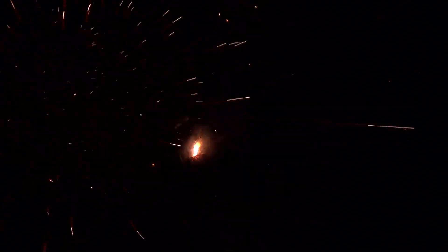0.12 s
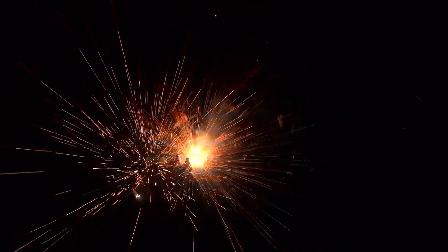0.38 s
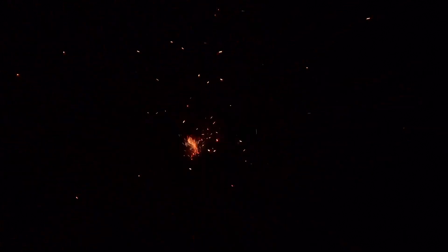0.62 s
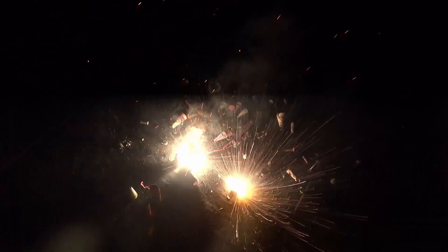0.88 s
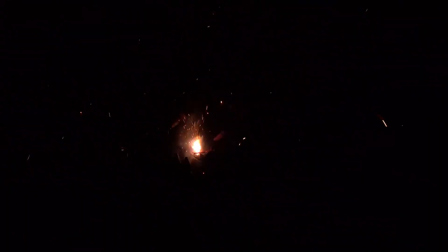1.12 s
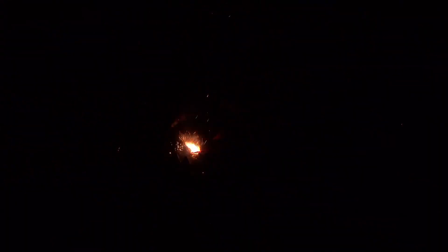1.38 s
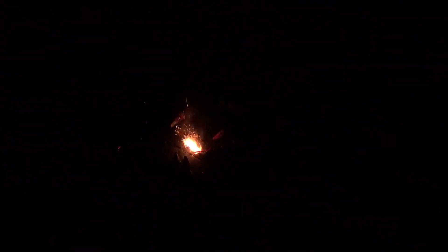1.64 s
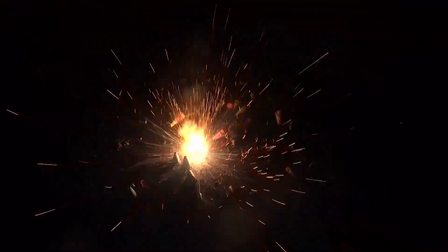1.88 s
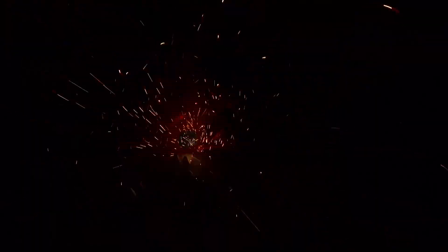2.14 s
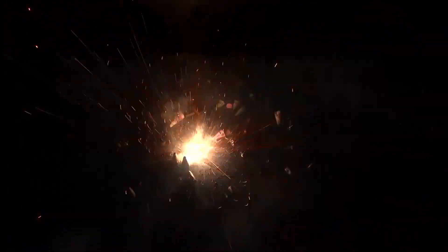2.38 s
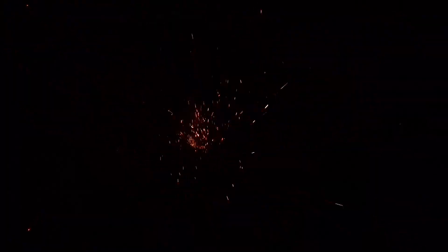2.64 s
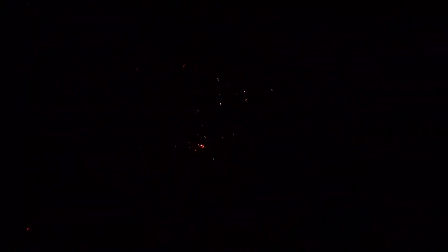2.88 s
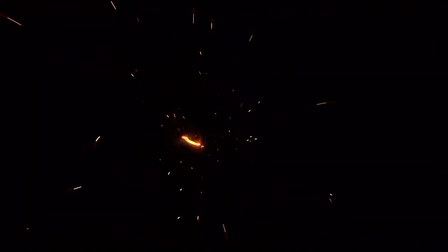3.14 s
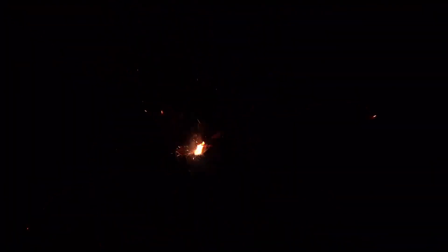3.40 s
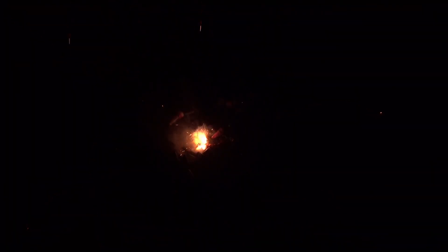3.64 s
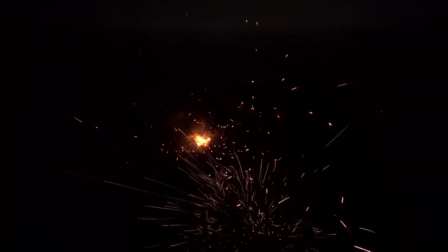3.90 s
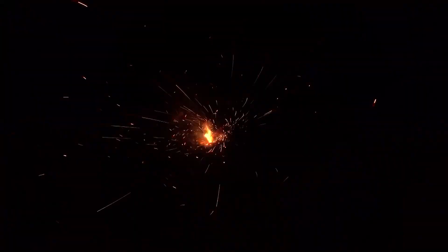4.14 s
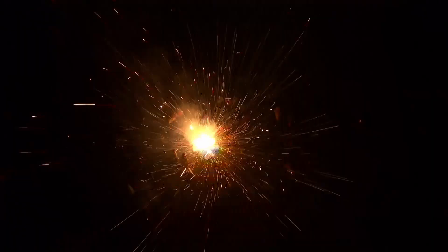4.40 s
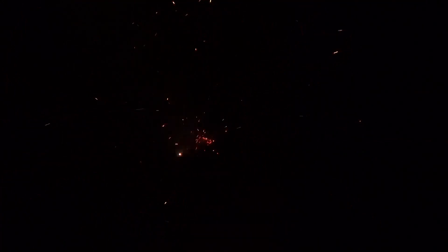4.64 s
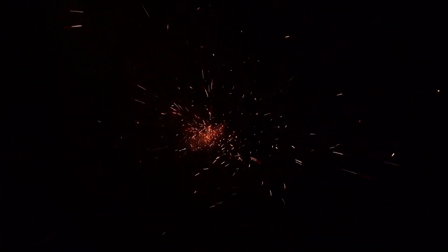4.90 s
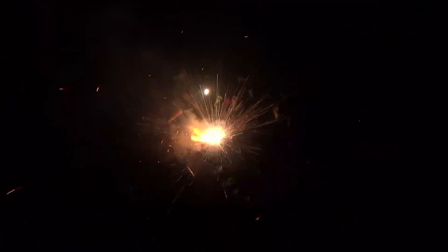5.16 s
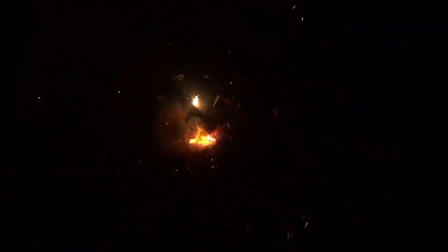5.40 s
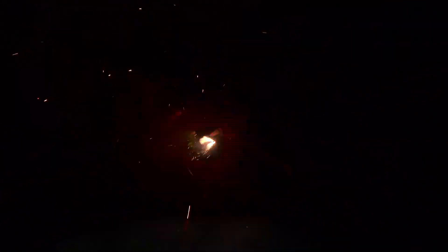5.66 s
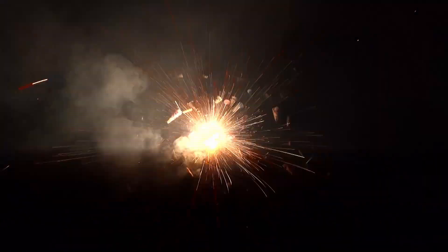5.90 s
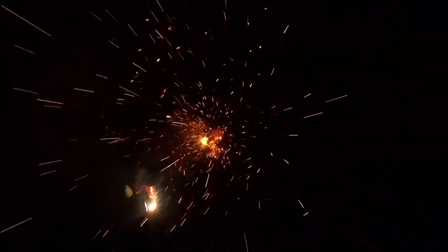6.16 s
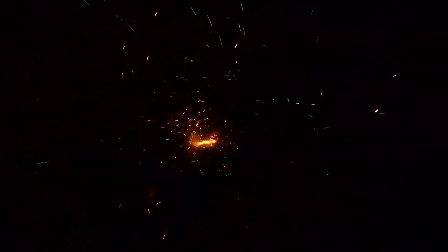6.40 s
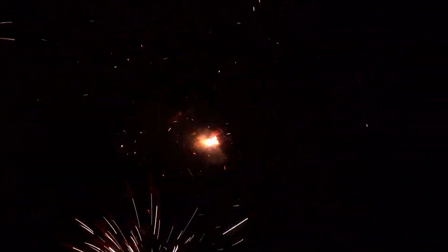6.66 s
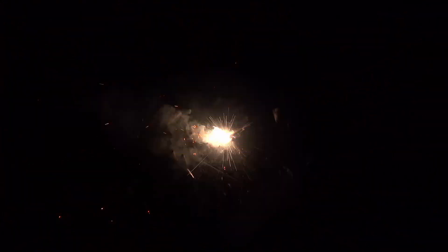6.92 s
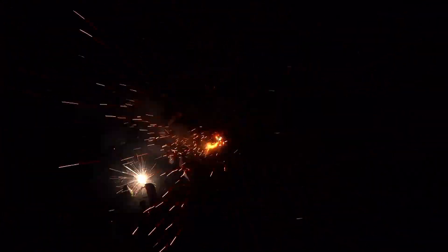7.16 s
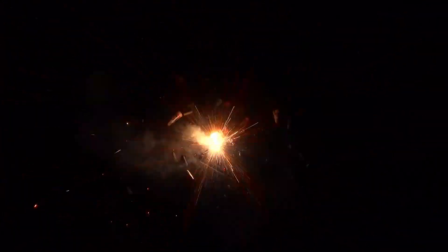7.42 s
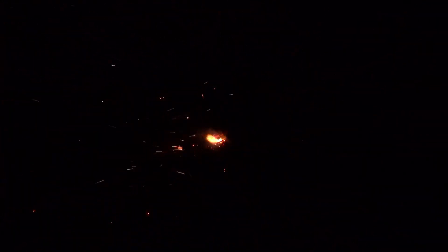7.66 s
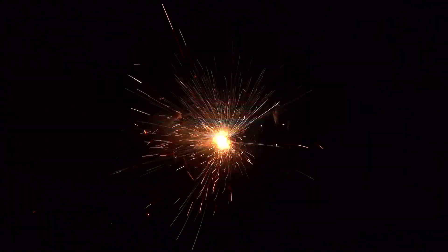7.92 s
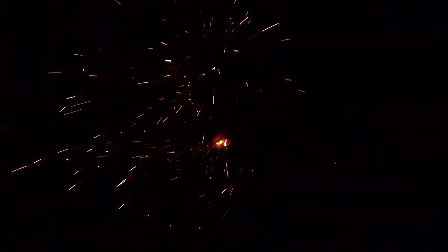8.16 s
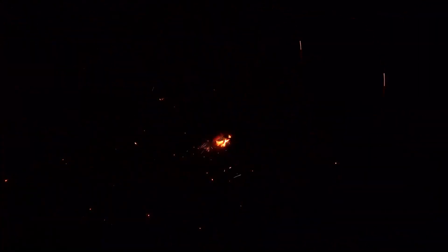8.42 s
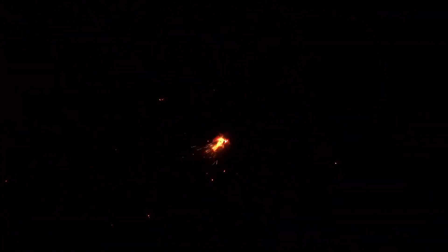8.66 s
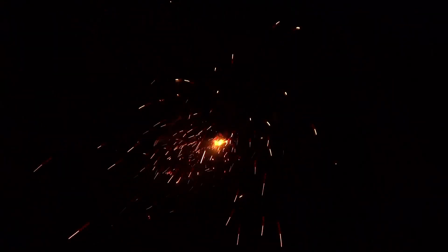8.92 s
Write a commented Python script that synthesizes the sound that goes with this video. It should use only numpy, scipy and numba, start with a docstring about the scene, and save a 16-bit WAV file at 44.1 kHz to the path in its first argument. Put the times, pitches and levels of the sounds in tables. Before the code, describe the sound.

Crackling firework stars burst on the ground in a walled yard at night, hard cracks with slapping echoes and hissing tails over a fizzing fuse.

```python
"""A ribbon of crackling stars burns on the ground of a walled yard at night, a few steps from a small camera.
From the start stars burst with a crack and a low push; walls answer with slaps and a hissing tail, far houses rumble.
A faint pop and then a dull bang come from farther off near 1.5 s; after 2.6 s the bursts thin and the fuse shows.
From 3.8 s the bursts crowd again to the end, with faint distant pops near 7.4 s. The fuse fizzes throughout.
The camera's fast limiter squashes the bursts and lets the tails swell."""
import sys
import numpy as np
from scipy import signal
from scipy.fft import rfft, irfft, next_fast_len
from scipy.io import wavfile
from scipy.ndimage import uniform_filter1d, minimum_filter1d, map_coordinates
from numba import njit

SR = 44100
rng = np.random.default_rng(int(sys.argv[2]) if len(sys.argv) > 2 else 0)


def inscribe(sig):
    """Save sig as 16-bit PCM at rate SR to the path in sys.argv[1].

    A 1-D sig is mono; a 2-D sig holds one channel per row.
    Samples are clipped to [-1, 1] before scaling.
    """
    pcm = np.round(np.clip(np.atleast_2d(sig).T, -1, 1) * 32767)
    wavfile.write(sys.argv[1], SR, pcm.astype(np.int16))


def field_ratio(decibels):
    """Amplitude ratio for a level in dB (20 dB per decade); scalars and array-likes work."""
    return 10 ** (np.asarray(decibels, dtype=float) / 20)


N = 399105  # length in samples
LEAD = SR // 10  # samples of room for a burst just before the start

# Slaps from the yard walls. Each row: delay after the burst in ms, level relative to the other walls in dB.
WALL_SLAPS = [(7.4, 2), (9.6, 8), (12.5, 3), (17, 11), (20.3, 11), (25, 3), (37.2, 9), (59, 4), (75, 4)]
# Colour of sound from a distance. Each row: frequency in Hz, relative level in dB per Hz.
DISTANT_COLOUR = [(35, -43.5), (60, -22), (182, -0.5), (450, -0.5), (719, -3.5), (785, -9), (858, 0),
                  (917, -7.5), (6600, -24.5), (12000, -35), (15600, -63), (22000, -120)]


def unit(x):
    """Scales to rms 1 along the last axis."""
    return x / np.sqrt(np.mean(x ** 2, axis=-1, keepdims=True) + 1e-20)


def along(points, hz):
    """Interpolates (Hz, value) points on a log frequency axis."""
    f, v = np.transpose(points)
    return np.interp(np.log(hz + 1), np.log(f + 1), v)


def filtered(x, response):
    """Multiplies the spectrum of x by a complex response of frequency."""
    m = next_fast_len(x.shape[-1] + 8192)
    spectrum = rfft(x, m) * response(np.fft.rfftfreq(m, 1 / SR))
    return irfft(spectrum, m)[..., :x.shape[-1]]


def noise(spectrum, size):
    """Coloured noise of rms 1."""
    white = rng.standard_normal(size)
    return unit(filtered(white, lambda hz: field_ratio(along(spectrum, hz))))


def wobble(rate):
    """A smooth random curve with rate knots a second, at most 60."""
    knots = rng.standard_normal(int(N / SR * 60) + 4)
    return map_coordinates(knots, [np.arange(N) * min(rate, 60) / SR])


def placed(times, sounds):
    """Sum of sounds that start at the given seconds."""
    out = np.zeros(LEAD + N + sounds.shape[-1])
    for s, sound in zip(times, sounds):
        out[LEAD + round(s * SR):][:len(sound)] += sound
    return out[LEAD:LEAD + N]


def street(s, echo_db):
    """Far houses return a slow, lumpy rumble of each burst: dull noise under the summed power of slow swells."""
    # Dull answer of the houses. Each row: frequency in Hz, relative level in dB per Hz.
    house_colour = [(35, -34.5), (60, -14), (215, 6), (284, -2.5), (369, 1), (504, -1), (676, -13.5),
                    (3000, -8), (3900, -45), (6600, -120)]
    t = np.arange(SR) / SR
    swell = field_ratio(-60 * t / 1.44) * (1 - np.exp(-t / 0.075))  # t60 1.44 s, rise 75 ms
    power = placed(s, field_ratio(2 * (echo_db - 29.0))[:, None] * swell ** 2)
    lumps = field_ratio(3.5 * wobble(35))
    return np.sqrt(power) * lumps * noise(house_colour, N)


def far_bang():
    """A distant firework: a dull knock and a short low swing, then ragged echoes of noise."""
    # The bang and its echoes. Each row: start in seconds, level in dB.
    arrivals = [(1.6813, -14), (1.697, -23.5), (1.708, -23), (1.753, -18.5), (1.799, -29), (1.832, -27.5)]
    s, db = np.transpose(arrivals)
    t = np.arange(SR // 4) / SR
    echoes = noise(DISTANT_COLOUR, (len(s), len(t)))
    echoes *= field_ratio(-2.5 - 60 * t / 0.24) * (1 - np.exp(-t / 0.0032))
    knock = field_ratio(5 - 60 * t / 0.0044) * np.sin(2 * np.pi * 1100 * t + np.pi)
    boom = np.sin(2 * np.pi * 290 * t - 1.2) * field_ratio(-60 * (t / .018) ** 2)
    rounded_front = 1 - np.exp(-t / 0.0002)  # distance rounds the front
    echoes[0] = (boom + knock) * rounded_front + 0.3 * echoes[0]
    return placed(s, field_ratio(db)[:, None] * echoes)


def far_pops():
    """Distant crackers arrive as short rough blips over a thud."""
    # Each row: start in seconds, level in dB, blip pitch in Hz, relative level of the thud in dB.
    pops = [(1.39, -29.5, 497, -10), (7.301, -27, 940, 2), (7.346, -26, 892, -19), (7.384, -32, 1070, -8),
            (7.408, -24, 1230, -8), (7.425, -24, 1110, -5)]
    s, db, hz, thud_db = np.transpose(pops)[..., None]
    t = np.arange(SR // 20) / SR
    blip = np.sin(2 * np.pi * hz * t)
    blip = blip + field_ratio(thud_db + 2.0) * np.sin(2 * np.pi * 290 * t)
    blip += 0.91 * noise(DISTANT_COLOUR, blip.shape)
    envelope = field_ratio(db - 1 - 60 * t / 0.026) * (1 - np.exp(-t / 0.0023))
    return placed(s[:, 0], envelope * blip)


def fuse():
    """The burning ribbon: two noises, a high fizz and a low flame flutter, drift and wobble in level."""
    # Each row: time in seconds, fizz level in dB, flame level in dB.
    burning = [(0.7, -53, -45.5), (1.4, -55, -48.5), (1.56, -57.5, -53), (1.66, -53, -53),
               (2.9, -52.5, -64), (3.02, -49.5, -53), (3.3, -57, -60.5), (3.376, -56.5, -60),
               (3.404, -45.5, -57), (3.448, -52.5, -60), (3.572, -51.5, -61), (3.628, -50.5, -52.5),
               (3.76, -50.5, -54), (7.44, -50, -49), (8.58, -57, -53.5), (8.686, -57, -55.5),
               (8.75, -48, -52)]
    # Colours of the two. Each row: frequency in Hz, relative level in dB per Hz.
    fizz_colour = [(710, -49.5), (1200, -9.5), (5760, -7.5), (7170, -1.5), (8180, -3), (9540, -1.5),
                   (12100, -6), (15300, -9), (16000, -32), (16500, -41.5)]
    flame_colour = [(15, -29), (25, -29), (97, -8.5), (143, -7), (275, -5), (310, -6.5), (350, -5.5),
                    (1500, -18), (1950, -32), (3300, -120)]
    s, fizz_db, flame_db = np.transpose(burning)
    t = np.arange(N) / SR
    fizz = field_ratio(np.interp(t, s, fizz_db) + 0.33 * wobble(52)) * noise(fizz_colour, N)
    flame = field_ratio(np.interp(t, s, flame_db) + 0.75 * wobble(33)) * noise(flame_colour, N)
    return fizz + flame


def earlier_ms(s):
    """Stars flung nearer the walls are answered sooner: a negative shift in ms."""
    # Each row: time of the burst in seconds, shift of its slaps in ms (negative is sooner).
    thrown = [(.94, -2.9), (5.56, -1.7), (5.95, -2.4), (8.14, -2.7)]
    return sum(ms * (np.abs(s - at) < .01) for at, ms in thrown)


def yard(s, echo_db, band_hz, lift_db, swell_db):
    """Every burst gets its own tail: wall slaps, a swell near 32 ms, then a hiss whose bands die at their own rates."""
    # Colour of the echo. Each row: frequency in Hz, relative level in dB per Hz.
    yard_colour = [(59, -40), (100, -32), (190, 5), (496, -8), (963, 2.5), (1410, -5.5), (1750, 1),
                   (2360, -2.5), (2630, 1.5), (3180, -2.5), (7020, -1.5), (10100, -6), (13300, -12),
                   (15500, -22), (16500, -51)]
    # Decay of the yard. Each row: frequency in Hz, time to fall 60 dB in seconds.
    decay = [(100, 0.11), (500, 0.47), (2000, 0.39), (6000, 0.45), (10000, 0.36), (15000, 0.3)]
    hz, frame, z = signal.stft(rng.standard_normal((len(s), SR * 3 // 5)), SR, nperseg=256)
    octaves = np.log2((hz + 1) / band_hz[:, None])
    hump_db = lift_db[:, None] * np.exp(-(octaves / 1.24) ** 2)  # blast length sets the band
    colour_db = along(yard_colour, hz) + hump_db
    z = z * field_ratio(colour_db[..., None] - 60 * frame / along(decay, hz)[:, None])
    tail = signal.istft(z, SR, nperseg=256)[1]
    tail /= np.sqrt(np.mean(tail[:, 900:1800] ** 2, axis=1, keepdims=True))  # rms 1 from 20 to 41 ms

    ms = np.arange(tail.shape[1]) / SR * 1000 - earlier_ms(s)[:, None]
    shape = 1 - np.exp(-np.maximum(ms - 6, 0) / 8)  # scattered sound fills in after the first wall
    shape *= 1 + field_ratio(swell_db)[:, None] * np.exp(-((ms - 32) / 22) ** 2)
    glints = rng.exponential(size=tail.shape) ** 3  # small hard faces glint
    specks = unit(uniform_filter1d(glints, size=30, axis=1) - 6)
    shape *= field_ratio(2.8 * np.exp(-ms / 130) * np.minimum(specks, 3.5))

    early = ms[:, :SR // 10]
    luck = rng.standard_normal((len(s), len(WALL_SLAPS), 2)) * [.15, 2]  # spread in ms and in dB
    smear_db = -0.32 * (echo_db[:, None] + 23.5)  # big bursts fill the yard, so their slaps stand out less
    slaps = np.zeros_like(early)
    for k, (at, db) in enumerate(WALL_SLAPS):
        late = np.maximum(early - at - luck[:, k, :1], 0)
        slap_db = db + smear_db + luck[:, k, 1:] - 60 * late / 7
        slaps += (1 - np.exp(-late / 0.23)) * field_ratio(slap_db)
    head = tail[:, :SR // 10]
    echo = shape * tail
    echo[:, :SR // 10] += slaps * (head + 0.14 * np.diff(head, prepend=0))  # one bounce keeps more treble
    return placed(s, field_ratio(echo_db)[:, None] * echo)


def bounces(s, echo_db):
    """Each flat wall sends the crack back as a sharp copy, without the low push."""
    no_push_db = np.full(len(s), -np.inf)
    out = 0
    for ms, db in WALL_SLAPS:
        # weaker by 0.092 dB per dB of echo and by 0.1 dB per ms of path, with 2.6 dB of luck
        loss_db = -25.5 + db - 0.092 * echo_db - 0.1 * ms + rng.normal(0, 2.6, len(s))
        out = out + cracks(s + (ms + earlier_ms(s)) / 1000, echo_db, no_push_db, loss_db)
    return out


def cracks(s, echo_db, push_db, loss_db=0):
    """A shock front rings briefly, spits fragments, and drags a slowing low push behind."""
    # Resonances of the crack. Each row: frequency in Hz, width in Hz, relative level in dB.
    resonances = [(1500, 1000, 6.5), (4260, 2500, 4.5), (6830, 980, 10), (8730, 2300, 5),
                  (13000, 36000, -11)]

    def ring(f):
        """Sum of the resonant bands."""
        return sum(field_ratio(db) * 1j * f * w / (c * c - f * f + 1j * f * w) for c, w, db in resonances)

    t = np.arange(SR // 25) / SR
    spit = field_ratio(-17.0 - 60 * t / 0.014) * rng.standard_normal((len(s), len(t)))
    spit[:, 0] = -1  # the shock front
    snap = filtered(spit, ring)
    snap /= np.abs(snap).max(axis=1, keepdims=True)
    swing = np.sin(np.pi * np.log((t + .0016) / .0022) / np.log(1.76))  # each half swing lasts 1.76 times the last
    push = swing * np.exp(-(t / 0.0063) ** 1.05) * (1 - np.exp(-t / 0.0004))
    push /= np.abs(push).max()
    crack_db = np.maximum(echo_db + 29, 4)  # the direct crack towers over its echo; even small stars snap hard
    return placed(s, field_ratio(crack_db + loss_db)[:, None] * snap + field_ratio(push_db)[:, None] * push)


def scene():
    """Two close microphone ports hear nearly the same, plus and minus a faint side sound; the left is a shade louder."""
    # The bursts. Each row: start in seconds, yard echo level in dB, push peak in dB, favoured echo band in Hz,
    # lift of that band in dB.
    bursts = [(-0.03, -14, -42, 4800, 6), (0.09, -12.5, -4.5, 6240, 7), (0.1105, -14, -16, 1500, 1.5),
              (0.2316, -18, -1.5, 12100, 5), (0.4113, -16.5, -19, 1200, 0), (0.439, -19, -21, 2610, 2),
              (0.8418, -10, -4, 8200, 4.5), (0.9387, -7.5, -22, 12000, -0.5), (0.9514, -14, -25, 4500, 15),
              (0.9869, -14, -3, 1210, 6.5), (1.0455, -15, -3, 1410, 0), (1.8658, -12, 4.5, 1850, 1),
              (1.8996, -15.5, -12, 2600, -4), (1.9437, -13.5, -3.5, 11800, 0.5), (2.038, -14, 6, 4700, 1),
              (2.1176, -11.5, -1, 4000, 0.5), (2.1371, -11.5, 0.5, 10900, 6),
              (2.217, -15.5, -17, 6600, 6.5), (2.3765, -16.5, -0.5, 2600, 1), (2.4245, -13, -1, 1140, 3.5),
              (2.4495, -11.5, -1, 2580, 2.5), (2.6018, -14, 0.5, 1190, -2), (3.039, -28.5, -22, 2920, 1.5),
              (3.7808, -15, 2, 12300, 7.5), (3.8378, -16.5, -3, 12600, 6), (3.9471, -14.5, 0, 12400, 5.5),
              (4.0854, -9.5, -2, 7100, 3), (4.1724, -9, 6, 3000, 8), (4.3459, -19.5, -12, 2920, 4.5),
              (4.4429, -11.5, -5.5, 1260, -5.5), (4.4632, -15.5, -28, 12000, 7),
              (4.5289, -10.5, -29, 10400, 8), (4.7973, -11.5, -1, 1600, -1), (4.852, -12, -1.5, 2620, 1.5),
              (4.9073, -12, -27, 8600, 5.5), (4.9977, -11, -5, 6500, 5), (5.0702, -13, 1.5, 12100, 3),
              (5.2199, -12.5, -15, 12200, 2.5), (5.3242, -13, 3.5, 7200, 5.5),
              (5.558, -33, -24, 11900, 4.5), (5.741, -20.5, -21, 9100, 7),
              (5.9509, -13, -10.5, 12000, -1.5), (5.9563, -18.5, -31, 12000, 22),
              (6.0264, -12, -39, 12300, 1.5), (6.1545, -20, -12.5, 1980, 3), (6.1564, -17.5, -25, 2500, 4),
              (6.2698, -11, -37, 7780, 2.5), (6.3954, -11.5, -3.5, 1200, -0.5),
              (6.563, -12.5, -1.5, 2600, 2.5), (6.6063, -13.5, 0.5, 12000, 4.5),
              (6.7026, -34.5, -22, 4020, 13), (6.823, -15, -1, 12070, 3), (6.9893, -12.5, -4, 2540, 1.5),
              (7.0263, -14, -39, 3520, 5.5), (7.1114, -14, 0, 4470, 3), (7.219, -37.5, -43, 4730, 7),
              (7.4879, -19, -4.5, 1290, 2.5), (7.6388, -14, 2.5, 7900, 4), (7.7881, -9, -14, 7100, 5),
              (7.895, -5, 1.5, 4050, 8), (7.9749, -15, -1.5, 3430, 2), (8.1447, -28, -54.5, 11900, 10),
              (8.2388, -29, -28, 1200, 6.5), (8.3174, -18.5, -19, 1160, 1.5),
              (8.7667, -13, -5.5, 2400, 2.5), (8.8073, -10.5, -12, 1240, -4.5),
              (8.8313, -15, -12, 11800, 8), (8.8445, -19.5, -32, 10700, 0)]
    # Level of the side noise against frequency, with some bands nearly empty.
    # Each row: frequency in Hz, gain of the side in dB.
    side_colour = [(60, -32), (99, -35), (160, -26.5), (270, -21), (450, -25), (740, -22), (1220, -42),
                   (2010, -45), (3330, -120), (5500, -18), (9080, -12.5), (15000, -74)]
    s, echo_db, push_db, band_hz, lift_db = np.transpose(bursts)
    # a stronger push or a quieter echo gives a bigger swell near 32 ms
    swell_db = -36 + 0.73 * push_db - 0.65 * echo_db

    def surroundings():
        """Yard, street and fuse with fresh random draws."""
        return yard(s, echo_db, band_hz, lift_db, swell_db) + street(s, echo_db) + fuse()

    direct = cracks(s, echo_db, push_db) + far_bang() + far_pops()
    mid = direct + bounces(s, echo_db) + surroundings()
    side = filtered(surroundings(), lambda hz: field_ratio(along(side_colour, hz)))
    side += field_ratio(-36) * mid  # tips the balance to the left
    side += filtered(cracks(s, echo_db, push_db), lambda hz: 1j * field_ratio(-19))  # a slight phase gap between ports
    return np.array([mid + side, mid - side])


@njit
def released(needed_db, keep):
    """Gain drops at once and creeps back."""
    out = needed_db.copy()
    for i in range(1, len(out)):
        out[i] = min(out[i], keep * out[i - 1])
    return out


def limiter(x, top_db, ahead_s, release_s):
    """Look-ahead limiter: the level ducks just before a burst and recovers over its tail."""
    peak = np.abs(x).max(axis=0)  # both channels share one gain
    needed_db = np.minimum(0, top_db - 20 * np.log10(peak + 1e-9))
    ahead = max(round(ahead_s * SR), 3)
    held_db = minimum_filter1d(needed_db, 2 * ahead + 1)
    gain_db = released(held_db, np.exp(-1 / (release_s * SR)))
    return x * field_ratio(uniform_filter1d(gain_db, ahead))


def low_pass(x):
    """Removes everything above the highest recorded frequency."""
    return signal.sosfilt(signal.butter(12, 16830, fs=SR, output="sos"), x)


def record(dry):
    """The camera: capsule overload and colour, limiter, full-scale clip and what it stores."""
    # Colour of the microphone. Each row: frequency in Hz, gain in dB.
    capsule = [(30, 0), (80, 0), (12000, 0), (14500, -2), (16500, -7)]
    overload = field_ratio(12)  # the capsule saturates softly towards this level
    x = overload * np.tanh(dry / overload)
    x = filtered(x, lambda hz: field_ratio(along(capsule, hz)))
    x = limiter(x, top_db=-.2, ahead_s=0.0021, release_s=0.039)
    return low_pass(np.clip(x, -1, 1))


dry = scene()
out = record(dry)
inscribe(out)
```